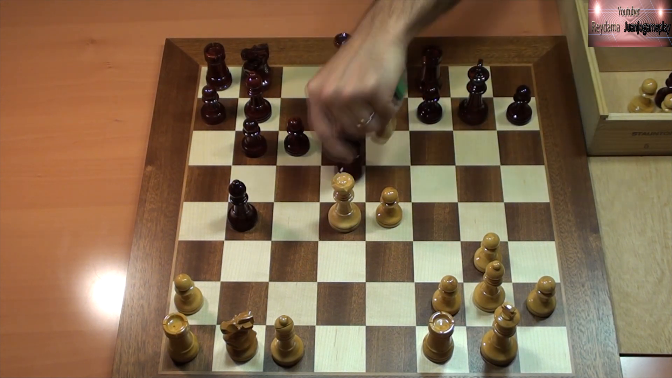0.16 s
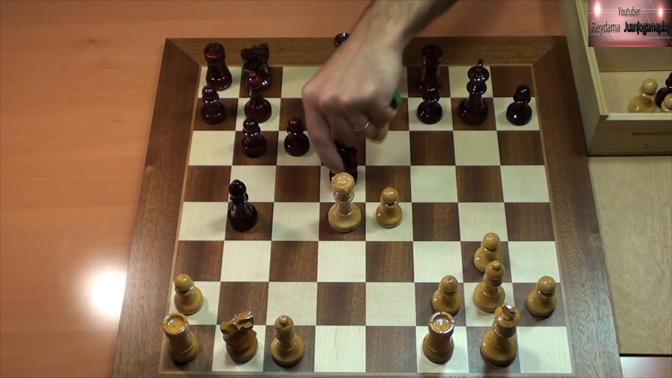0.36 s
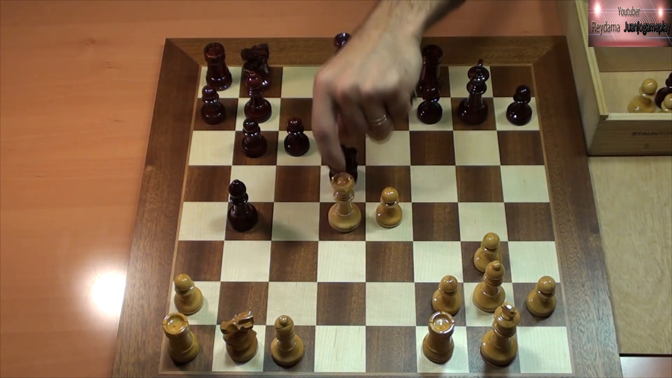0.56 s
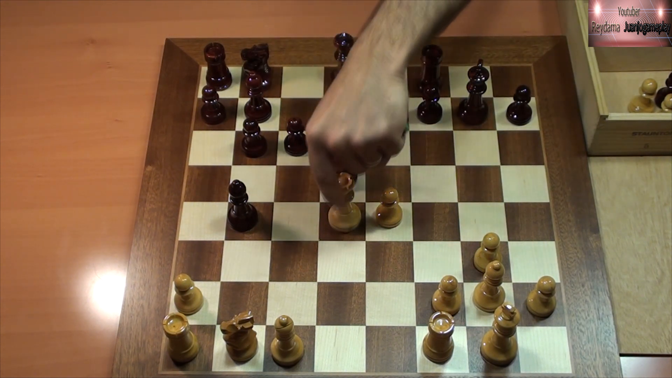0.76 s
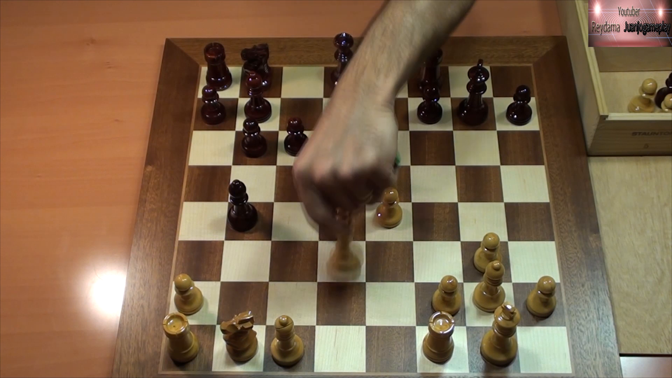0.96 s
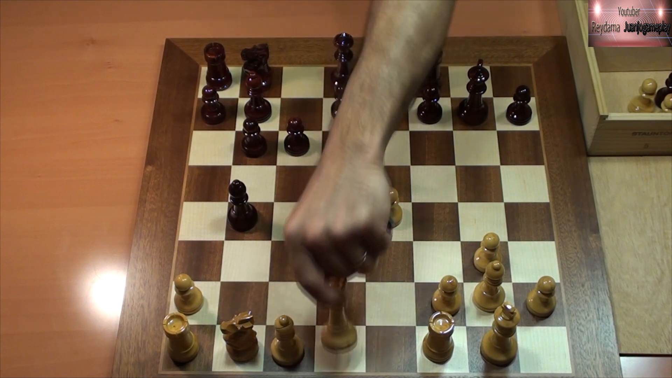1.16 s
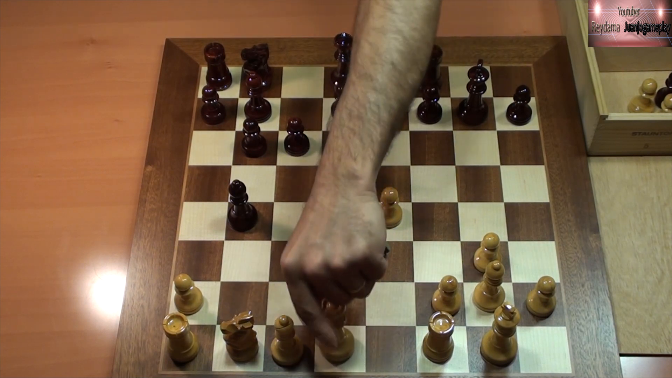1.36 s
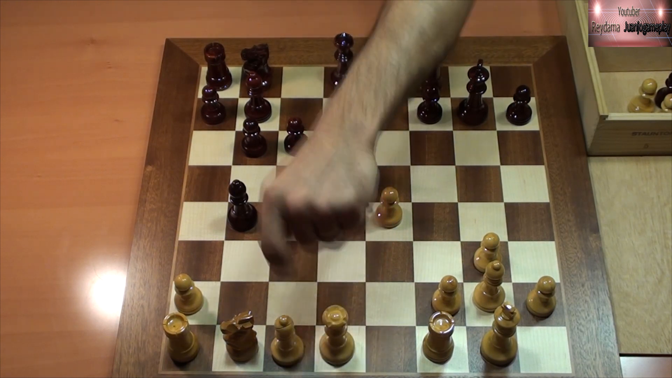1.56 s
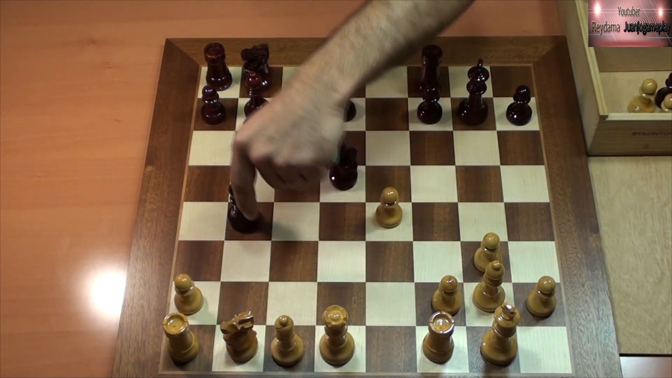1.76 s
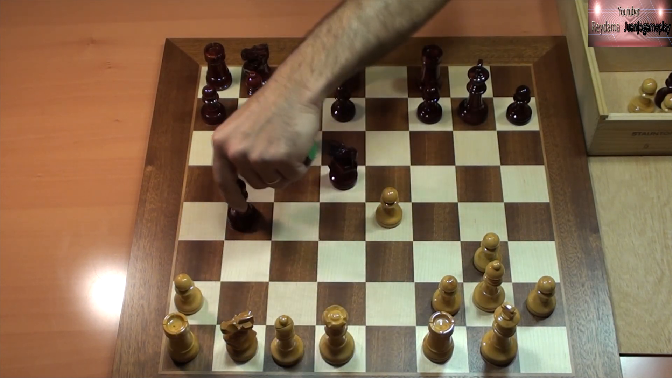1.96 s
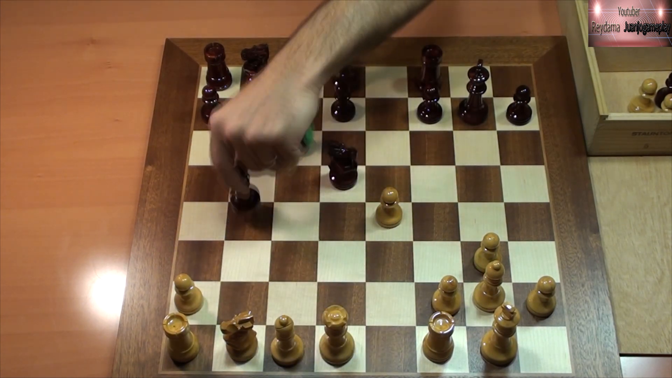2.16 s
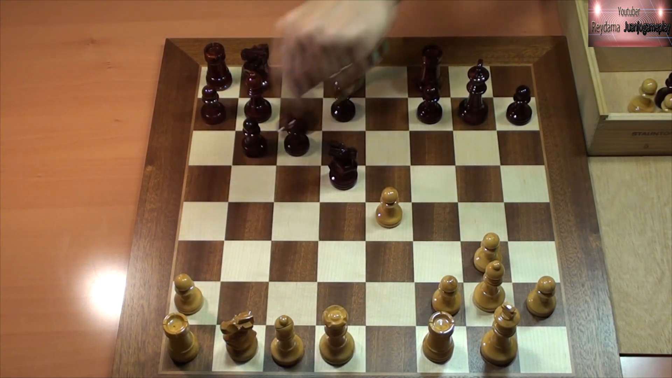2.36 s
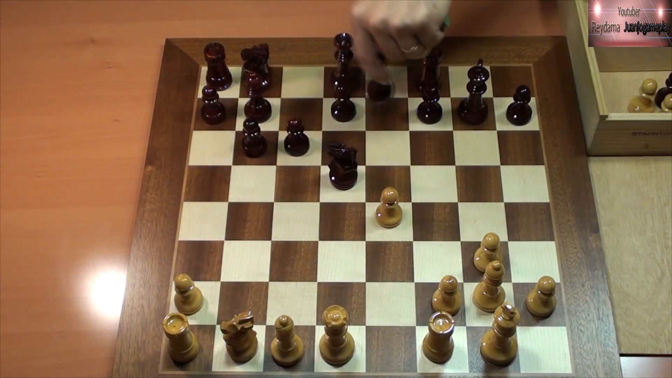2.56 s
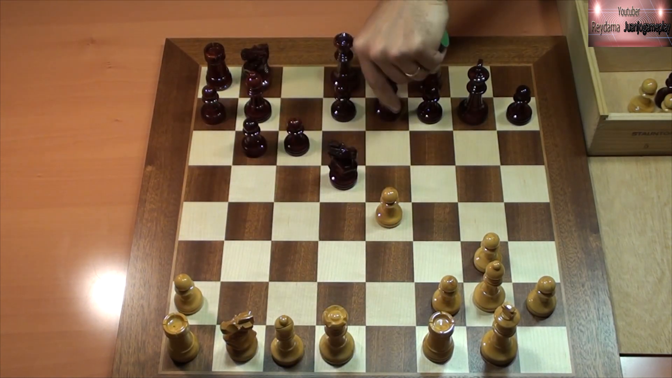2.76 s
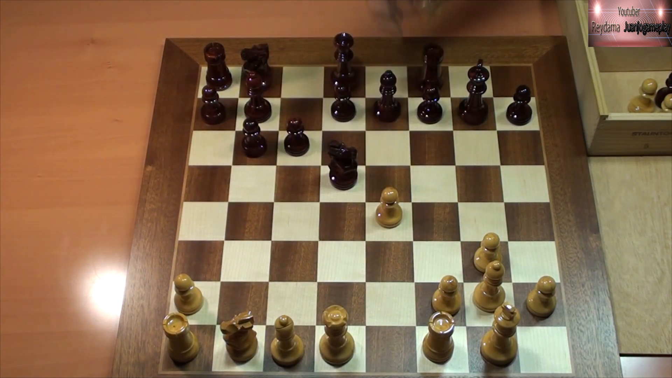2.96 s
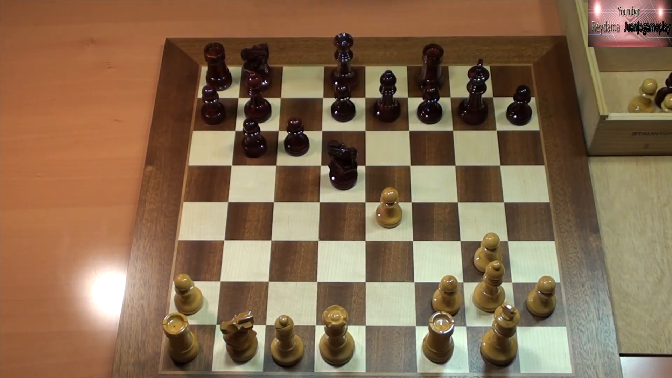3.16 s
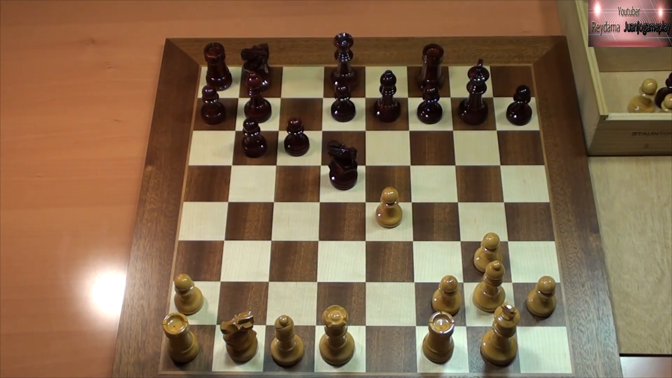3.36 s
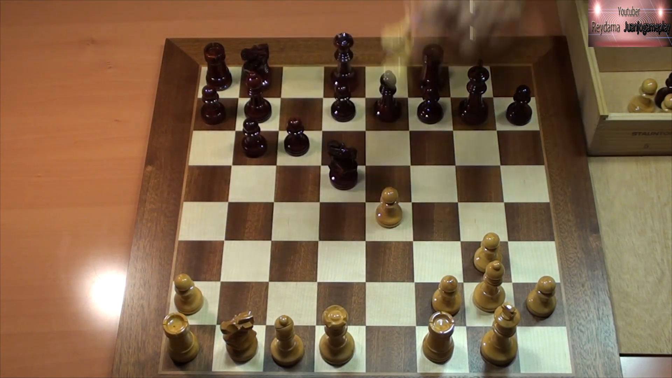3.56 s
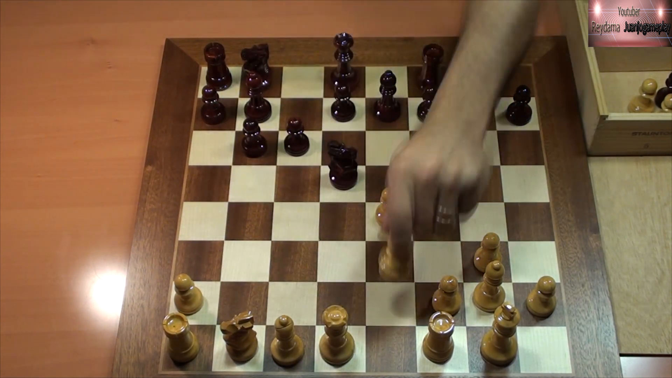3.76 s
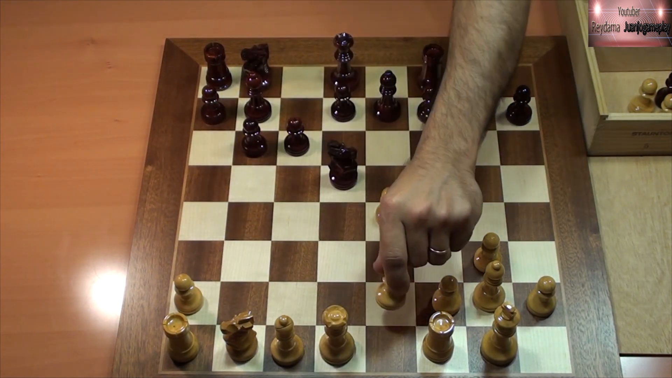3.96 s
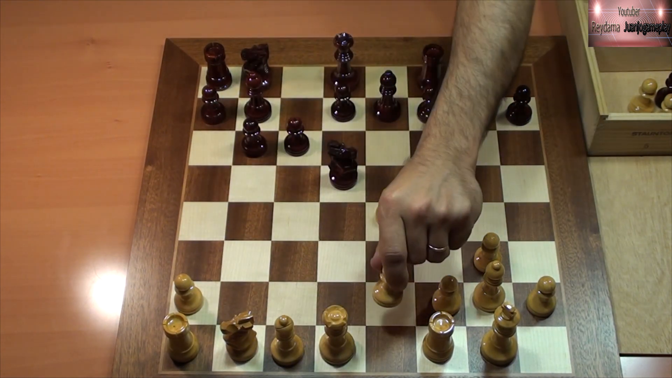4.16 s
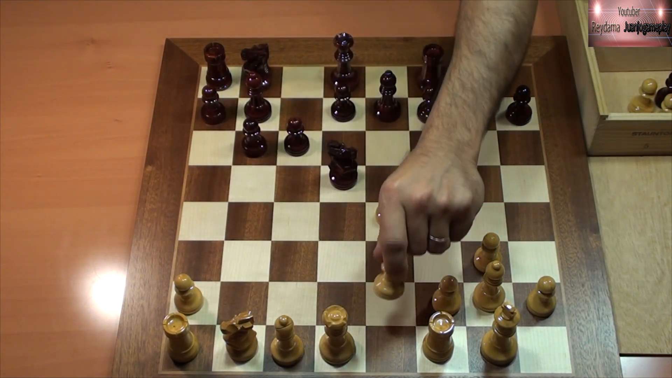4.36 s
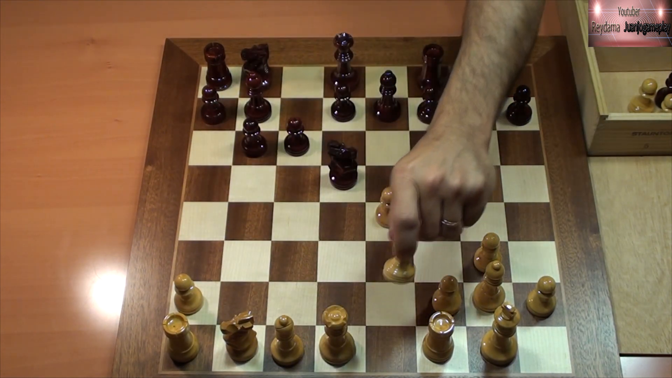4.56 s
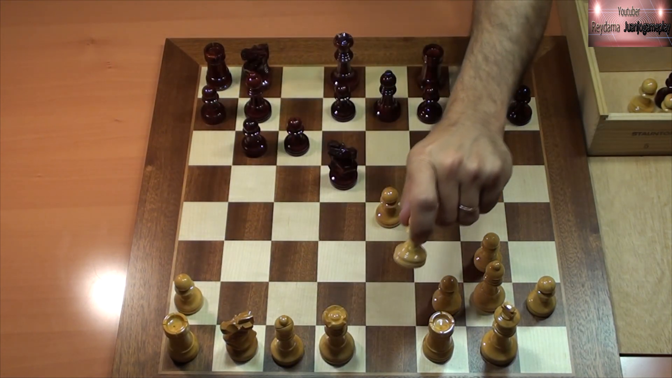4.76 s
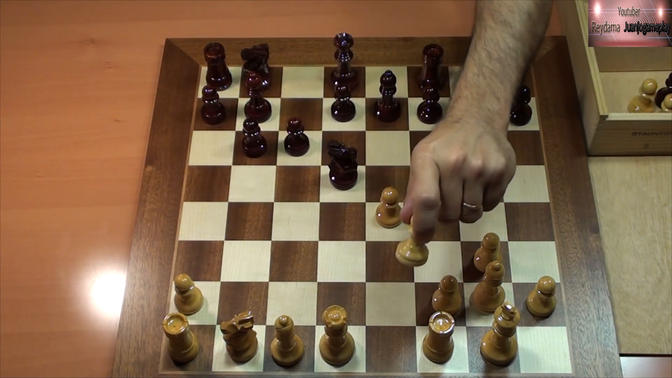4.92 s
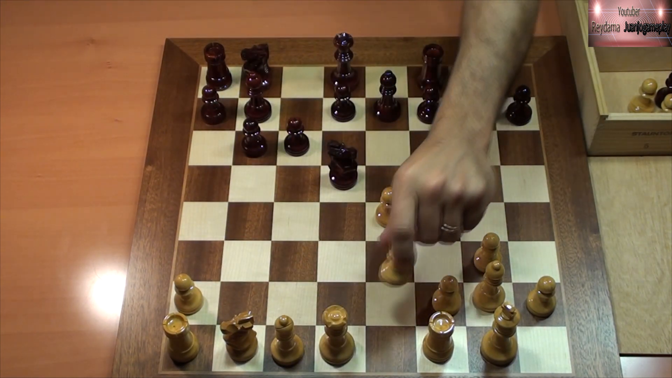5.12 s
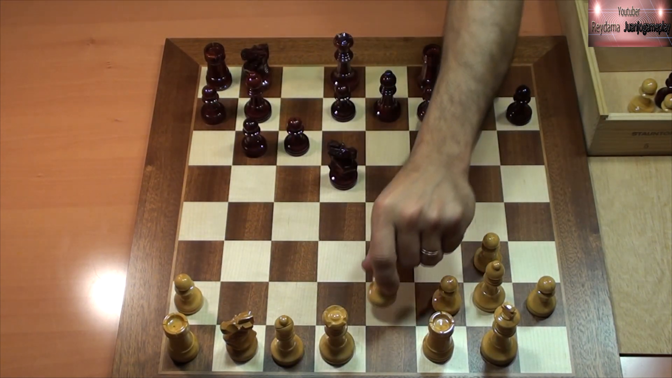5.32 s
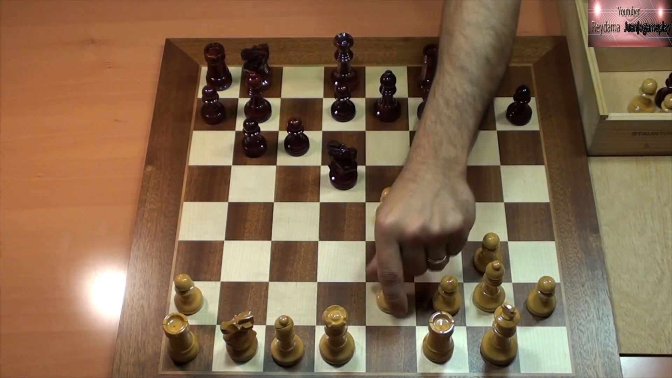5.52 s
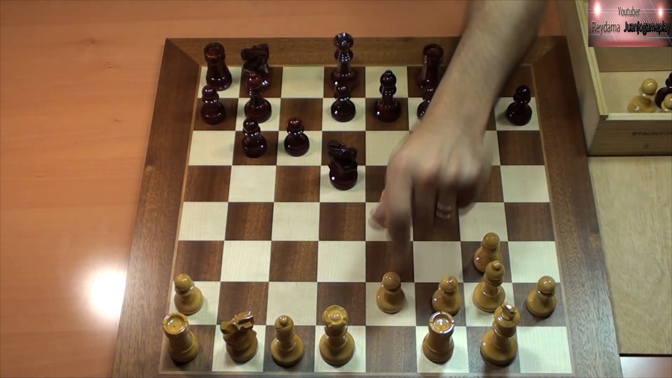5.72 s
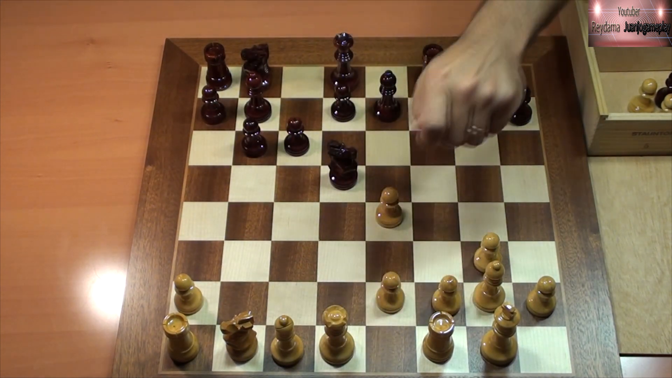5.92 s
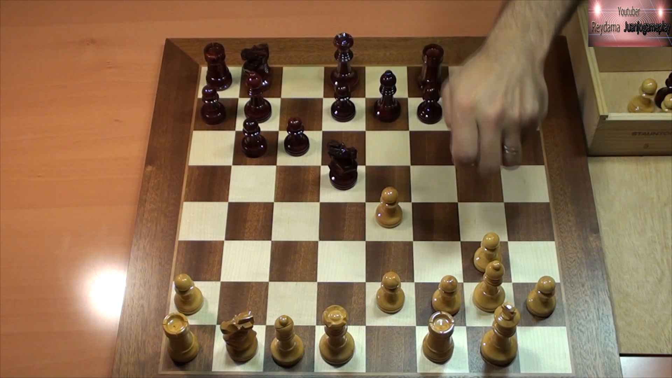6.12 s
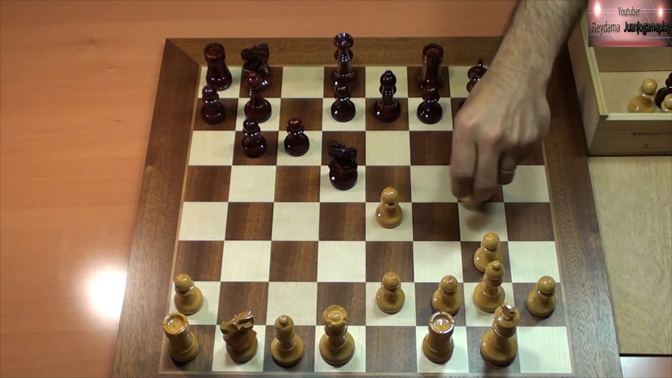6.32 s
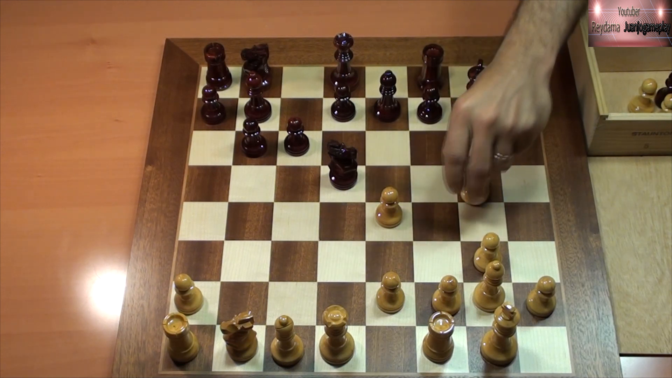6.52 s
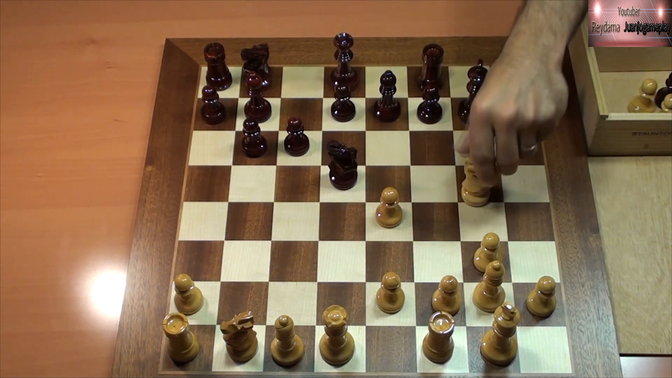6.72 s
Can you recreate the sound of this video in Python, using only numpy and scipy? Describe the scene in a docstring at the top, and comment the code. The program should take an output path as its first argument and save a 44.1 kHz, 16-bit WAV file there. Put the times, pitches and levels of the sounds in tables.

```python
"""Chess in a bare room

Wooden pieces are lifted and set down on a wooden board: felted bases thud, one piece lands hard, and pieces
click together in the hand. Filtered room responses and decaying sines make the wood; noise bursts make the rubs.
Behind lie a fan's wavering sines, a distant engine's two-tone drone that fades away, and filtered noise
for faint traffic, room tone and microphone hiss."""
import sys
import numpy as np
from scipy import signal
from scipy.fft import rfft, irfft, next_fast_len
from scipy.io import wavfile
from scipy.ndimage import uniform_filter1d, minimum_filter1d

SR = 44100
rng = np.random.default_rng(int(sys.argv[2]) if len(sys.argv) > 2 else 0)


def unload_wav(signal):
    """Save mono or channel-first audio to the path in sys.argv[1] as 16-bit WAV at rate SR, clipped to [-1, 1]."""
    wavfile.write(
        sys.argv[1],
        SR,
        np.round(np.clip(np.atleast_2d(signal).T, -1, 1) * 32767).astype(np.int16),
    )


N = 303849
RESPONSE_SIZE = 44100  # samples in a room response or a ring
TOP_HZ = 15800  # upper limit of the recorder


def undb(db):
    """Decibels to gain."""
    return 10 ** (np.asarray(db) / 20)


def unit(x):
    """Scale to an rms of one."""
    return x / np.sqrt(np.mean(x ** 2))


def along(points, hz):
    """Read (Hz, value) points on a log-frequency axis."""
    f, value = np.transpose(points)
    return np.interp(np.log(hz + 1), np.log(f), value)


def curve(table):
    """Draw a (s, value) table as one value a sample."""
    s, value = np.transpose(table)
    return np.interp(np.arange(N) / SR, s, value)


def bins(size):
    """Frequencies of a spectrum of that many samples."""
    return np.arange(size // 2 + 1) * SR / size


def colour(x, points):
    """Causal filter with a (Hz, dB) response, by way of the folded cepstrum."""
    size = 2 * next_fast_len(x.shape[-1])
    cepstrum = irfft(np.log(undb(along(points, bins(size)))))
    cepstrum[1:size // 2] *= 2
    cepstrum[size // 2 + 1:] = 0
    response = np.exp(rfft(cepstrum))
    return irfft(rfft(x, size) * response)[..., :x.shape[-1]]


def cut(x, hz, kind, order):
    """Butterworth low-pass or high-pass."""
    sos = signal.butter(order, min(hz, SR / 2 - 1000), kind, fs=SR, output="sos")
    return signal.sosfilt(sos, x)


def bandpass(x, edges_hz):
    """Butterworth band-pass."""
    return signal.sosfilt(signal.butter(2, edges_hz, "band", fs=SR, output="sos"), x)


def walk(rate):
    """Slow random drift of unit rms, from steps at that rate in Hz smoothed twice."""
    k = int(SR / rate)
    steps = np.repeat(rng.standard_normal(N // k + 1), k)
    smooth = uniform_filter1d(uniform_filter1d(steps, k), k)
    return unit(smooth[:N])


def swell(s, length, attack, release):
    """Rise, hold and fall, between 0 and 1."""
    t = np.arange(N) / SR - s
    return np.clip(np.minimum(t / attack, (length - t) / release), 0, 1)


def diffuse(size, side_db):
    """Noise from all around, as two close microphone capsules hear it: shared mid plus and minus a side."""
    mid, side = rng.standard_normal((2, size))
    return mid + np.array([[1], [-1]]) * colour(side, side_db)


def add(out, s, sound):
    """Mix a sound in at a time."""
    start = int(s * SR)
    out[:, start:start + sound.shape[-1]] += sound[..., :N - start]


# slow level curve of the fan's tone, before its trim: t/s, level/dB
FAN_LEVEL = [(0, -67.5), (3.3, -71.0), (3.7, -63.9), (4.25, -64.5), (4.7, -73), (5.1, -62), (6.25, -61.5),
             (6.5, -71.5), (6.89, -70.5)]
# steady motor lines, level before waver: f/Hz, level/dB
MOTOR_LINES = [(118.4, -75), (166.9, -72.5), (851, -77), (910, -74.5), (10401, -89)]
# spectral shape of room tone and hiss: f/Hz, level/dB
AIR_SPECTRUM = [(25, -35), (53, -16), (75, -22.5), (110, -12.5), (140, -20), (215, -12), (330, -13),
                (400, -15), (523, -16), (870, -18.5), (1270, -19.5), (4800, -27.5), (5600, -26),
                (15500, -30.5)]
# stereo width of sound from far away, side relative to mid: f/Hz, level/dB
FAR_SIDE = [(60, -9), (110, -18.5), (200, -13), (380, -8), (700, -3.5), (1290, -3.5), (2380, -5),
            (4400, -6.5), (8120, -12.5), (15000, -40.5)]
FAN_HZ, FAN_RISE_HZ_PER_DB = 292.7, 0.32  # blade rate at its quietest; louder is a little faster


def background(air_db=-55.23, fan_trim_db=3.5, waver_db=1.0):
    """A fan's blade tone and motor lines, sines of wavering level and phase, over room tone and hiss."""
    t = np.arange(N) / SR
    fan_db = curve(FAN_LEVEL)
    fan_hz = FAN_HZ + FAN_RISE_HZ_PER_DB * (fan_db - fan_db.min())
    tones = [(np.cumsum(fan_hz) / SR, fan_db + fan_trim_db)]
    tones += [(hz * t, db) for hz, db in MOTOR_LINES]
    lines = 0
    for turns, db in tones:
        level = undb(db + waver_db * walk(2.9))
        lines = lines + level * np.sin(2 * np.pi * turns + .5 * walk(3.3))
    air = unit(colour(diffuse(N, FAR_SIDE), AIR_SPECTRUM))
    return np.sqrt(2) * lines + undb(air_db) * air  # root two: line levels are rms


# traffic goes by: t/s, length/s, level/dB, attack/s, release/s
PASSES = [(-.1, 3.63, -55, 0.35, 2.6), (4.9, 2.6, -58.5, 1.0, .3)]
# spectral shape of the road noise: f/Hz, level/dB
ROAD_SPECTRUM = [(40, -26), (100, -16.5), (160, -2.5), (260, -6), (450, -6.5), (900, -12), (1800, -18),
                 (4000, -23.5), (9000, -28.5)]


def traffic(waver_db=.5):
    """A dull wash of road noise whose power builds, holds and dies away with each pass."""
    power = np.zeros(N)
    for s, length, db, attack, release in PASSES:
        power += undb(db) ** 2 * swell(s, length, attack, release)
    wash = unit(colour(diffuse(N, FAR_SIDE), ROAD_SPECTRUM))
    return wash * np.sqrt(power) * undb(waver_db * walk(5.25))


# reverberation time by band: f/Hz, t60/s
ROOM_DECAY = [(150, 1), (400, 0.69), (1000, 0.56), (2500, 0.65), (5000, 0.61), (9000, 0.28)]
# stereo width of the room's tail, side relative to mid: f/Hz, level/dB
NEAR_SIDE = [(60, -24), (110, -17), (200, -22), (380, -17.5), (700, -17), (1290, -18.5), (2380, -14.5),
             (4400, -12), (8120, -16), (15000, -40)]


def room(direct_db, early=1.0, early_s=0.0036, build_s=0.00033):
    """Path from one spot on the board: direct sound, strong early reflections, then a tail that dulls."""
    t = np.arange(RESPONSE_SIZE) / SR
    spectrum = rfft(diffuse(RESPONSE_SIZE, NEAR_SIDE))
    centres, t60s = np.transpose(ROOM_DECAY)
    tail = 0
    for share, t60 in zip(np.eye(len(centres)), t60s):
        # overlapping bands that add up to the whole spectrum
        band = irfft(spectrum * along(np.c_[centres, share], bins(RESPONSE_SIZE)))
        tail = tail + band * np.exp(-np.log(1000) * t / t60)
    tail = tail * (1 - np.exp(-t / build_s)) * (1 + early * np.exp(-t / early_s))
    path = unit(tail) / np.sqrt(RESPONSE_SIZE)
    path[:, 0] += undb(direct_db) / 2
    return path


def ring(modes, pitch=1):
    """Decaying sines of a struck body; a smaller body has a higher pitch."""
    t = np.arange(RESPONSE_SIZE) / SR
    total = np.zeros(RESPONSE_SIZE)
    for hz, db, t60 in modes:
        tone = np.sin(2 * np.pi * (hz * pitch * t + rng.random()))
        total += undb(db) * tone * np.exp(-np.log(1000) * t / t60)
    return total


# piece touches piece; a low free ring is a tight grip:
# t/s, level/dB, contact corner f/Hz, pitch ratio of the piece, free ring level/dB
PIECE_CLICKS = [(.1177, -27.5, 2500, 1.03, -31), (1.994, -32.5, 2500, 1.03, -27),
                (2.8088, -27, 9000, .94, -34), (2.8098, -17.5, 2100, .94, -20.5),
                (2.8122, -30.5, 4640, 1.15, -29), (3.088, -34.5, 2300, 1, -26),
                (5.4927, -20, 10000, 1.1, -36), (6.0080, -12, 9500, 1, -24.5)]
# broad response of a piece at pitch ratio 1: f/Hz, level/dB
PIECE_BODY = [(300, -37), (1100, -17.5), (1500, -8), (1900, 2.5), (2250, 7), (2700, -4), (3350, -1.5),
              (4000, -13), (4800, -18.5), (6600, -15.5), (7300, 1), (8200, -22), (10000, -24.5),
              (15000, -9)]
# ringing modes of a piece at pitch ratio 1: f/Hz, level/dB, t60/s
PIECE_RING = [(2200, -2, 0.33), (2314, -1, 0.4), (2380, -11.5, 0.48), (2535, -16, 0.48), (2910, -8.5, 0.45),
              (3350, -8.5, 0.47), (7230, -26, 0.76)]


def clicks(body_db=19, direct_db=3):
    """Bare wood on wood rings the small, high modes of a piece; a tight grip damps them."""
    out = np.zeros((2, N))
    for s, db, contact_hz, pitch, ring_db in PIECE_CLICKS:
        body = colour(room(direct_db), np.multiply(PIECE_BODY, [pitch, 1]))
        wood = undb(body_db) * body + undb(ring_db) * ring(PIECE_RING, pitch)
        add(out, s, undb(db) * cut(wood, contact_hz, "low", order=6))
    return out


# a distant engine works, then lets off; drone before its trim: t/s, level/dB
ENGINE_DRONE = [(0.15, -93), (0.35, -63.5), (0.75, -69), (0.88, -59.5), (1.45, -53.5), (1.57, -61),
                (2.27, -65), (2.75, -58.5), (3.45, -81.5)]
ENGINE_HZ, FULL_LOAD_DB = 78, -52  # firing rate under full load, and the table level that means full load
SAG_HZ_PER_DB = -0.15  # the rate drops a little as the drone gets quieter
ENGINE_FADE_S = .15


def engine(octave_db=-9, trim_db=0.9, waver_db=.7, octave_waver_db=2.5):
    """A distant engine: walls let through its firing tone and the octave; louder is slightly faster."""
    drone_db = curve(ENGINE_DRONE)
    hz = ENGINE_HZ + SAG_HZ_PER_DB * (FULL_LOAD_DB - drone_db)
    phase = 2 * np.pi * np.cumsum(hz * (1 + 0.014 * walk(7.1))) / SR
    firing = np.sin(phase) * undb(waver_db * walk(6.4))
    octave = np.sin(2 * phase) * undb(octave_db + octave_waver_db * walk(3.25))
    fade = swell(0, ENGINE_DRONE[-1][0], ENGINE_FADE_S, ENGINE_FADE_S)
    return unit(firing + octave) * undb(drone_db + trim_db) * fade


# felt slides on the board (low) and fingers rub on varnish (high):
# t/s, length/s, level/dB, centre f/Hz, width f/Hz
RUB_STROKES = [(0.151, .14, -59.5, 7400, 1400), (2.52, 0.073, -53.5, 770, 560),
               (2.528, 0.14, -52.5, 430, 290), (5.756, 0.0079, -55.5, 8000, 1090),
               (5.778, 0.01, -56, 7200, 900)]


def friction(grain_db=3.5):
    """Dense uneven slips that swell and fade over each stroke and echo in the room."""
    out = np.zeros((2, N))
    for s, length, db, hz, width_hz in RUB_STROKES:
        size = int(length * SR)
        slips = rng.standard_normal(size) * undb(grain_db * rng.exponential(size=size))
        edges = np.clip([hz - width_hz / 2, hz + width_hz / 2], 20, TOP_HZ)
        stroke = unit(bandpass(slips, edges)) * np.hanning(size)
        add(out, s, undb(db) * signal.fftconvolve(room(direct_db=7), stroke[None], axes=1))
    return out


# a base meets the board; a low contact corner is soft felt:
# t/s, level/dB, contact corner f/Hz, direct sound level/dB, f/Hz that the square favours
LANDINGS = [(1.3198, -20, 1380, 2.5, 403), (1.3293, -17.5, 930, 4.5, 780), (2.7854, -13.5, 1340, 7.5, 990),
            (5.4914, -2, 3020, -3.5, 970), (5.4946, 1, 3150, 7, 2450), (5.5082, -3.5, 2880, 7, 1340),
            (6.5134, -20.5, 850, 1.5, 488)]
# broad response of the board: f/Hz, level/dB
BOARD_BODY = [(40, -12), (110, -16.5), (230, 5), (310, -2.5), (385, 2), (460, -2), (630, 2), (850, 1.5),
              (970, 6.5), (1170, 1.5), (1370, 6), (1600, 1.5), (2700, -3), (3500, -6.5), (4600, -7.5),
              (8000, 15.5)]
# ringing modes of the board: f/Hz, level/dB, t60/s
BOARD_RING = [(385.7, -3.5, 0.32), (623, -5, 0.27), (664.7, 1, 0.24), (720, -3, 0.22), (760, -16, 0.29),
              (994, 1, 0.34), (1330, -24, 0.34), (1334, -7, 0.25), (1437, -4, 0.33), (1500, -17, .38),
              (1660, -14.5, 0.55), (1809, -36, .42), (1920, -9.5, 0.31), (2112, -4, 0.27),
              (2075, -12, 0.58), (2494, -17, 0.31), (2586, -13.5, .34)]
SQUARE_DB = 3  # lift of the modes under a square
BOARD_RING_DB, RING_DB_PER_DB = -17, .5  # free ring at 0 dB; a gentler base stays pressed down and damps it
BASS_HZ, BASS_DOUBLING_DB = 875, 9.5  # bass corner of a 0 dB blow; it halves for each such step softer


def knocks(body_db=25, spread=1.74):
    """Each landing drives the board; a softer contact lasts longer and leaves out the high modes."""
    out = np.zeros((2, N))
    for s, db, contact_hz, direct_db, square_hz in LANDINGS:
        ring_db = BOARD_RING_DB + RING_DB_PER_DB * db
        body = colour(room(direct_db), BOARD_BODY)
        wood = undb(body_db) * body + undb(ring_db) * ring(BOARD_RING)
        # each square lies near the antinodes of different modes
        wood = colour(wood, [(square_hz / spread, 0), (square_hz, SQUARE_DB), (square_hz * spread, 0)])
        # a gentle landing presses on and thuds; a hard one rebounds and has less bass for its strength
        bass_hz = BASS_HZ * 2 ** (db / BASS_DOUBLING_DB)
        softened = cut(wood, contact_hz, "low", order=6)
        add(out, s, undb(db) * cut(softened, bass_hz, "high", order=2))
    return out


# tone of the left capsule: f/Hz, level/dB
LEFT_BALANCE = [(60, -.6), (200, -1.1), (600, -.6), (2000, -.2), (4000, 0)]


def scene():
    """The moves on the board over the quiet room; the right capsule hears a little more bass."""
    left, right = background() + traffic() + clicks() + engine() + friction() + knocks()
    return np.array([colour(left, LEFT_BALANCE), right])


def record(dry):
    """The recorder's limiter ducks smoothly ahead of any peak over full scale, and the top is cut."""
    needed = 1 / np.maximum(np.abs(dry).max(axis=0), 1)
    gain = uniform_filter1d(minimum_filter1d(needed, size=129), size=129)
    top_cut = signal.ellip(10, .1, 90, TOP_HZ, fs=SR, output="sos")
    return signal.sosfilt(top_cut, dry * gain)


dry = scene()
out = record(dry)
unload_wav(out)
```